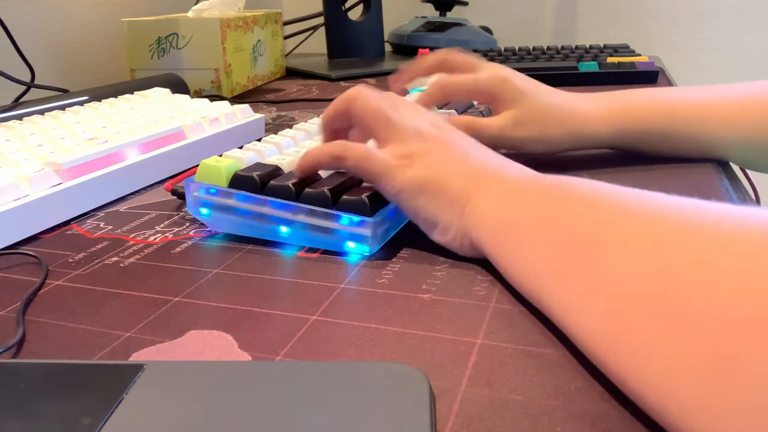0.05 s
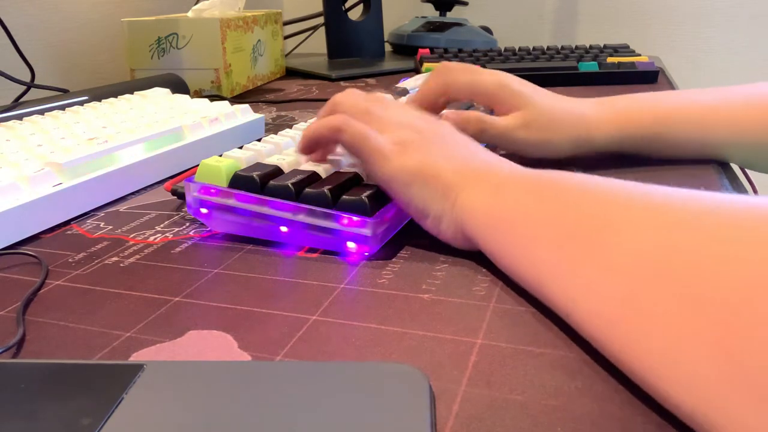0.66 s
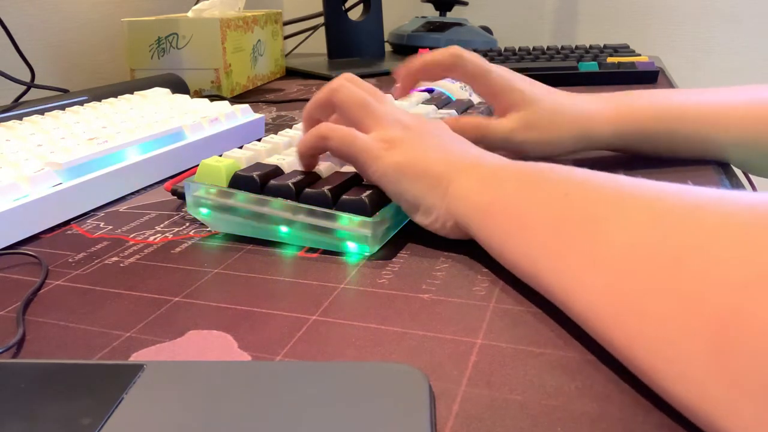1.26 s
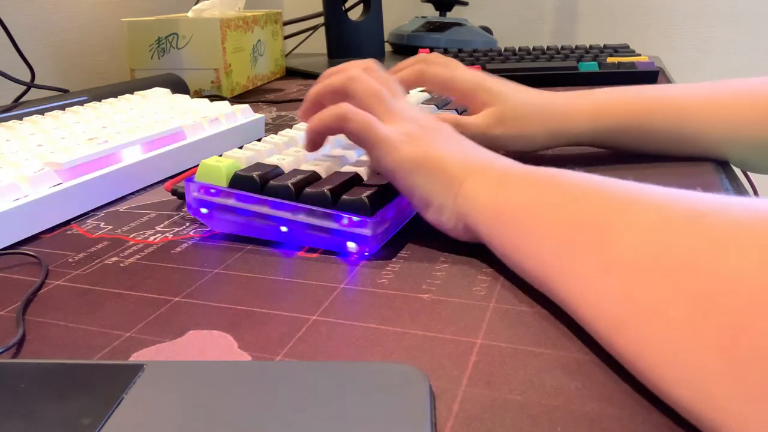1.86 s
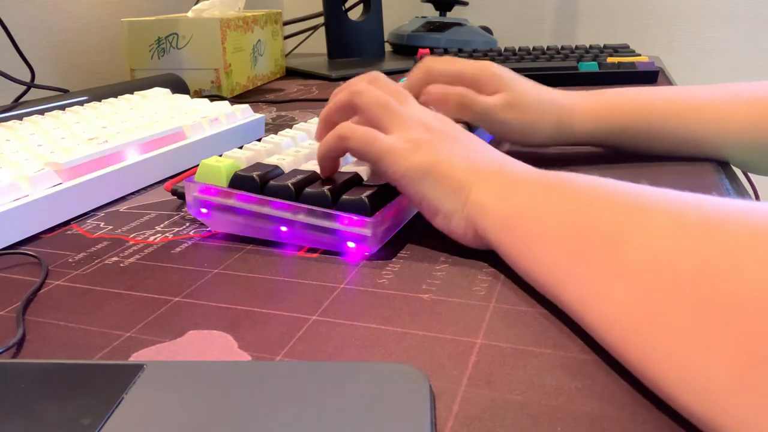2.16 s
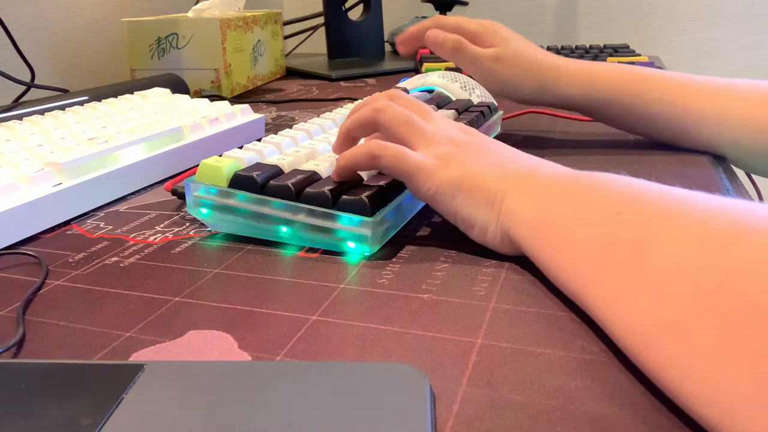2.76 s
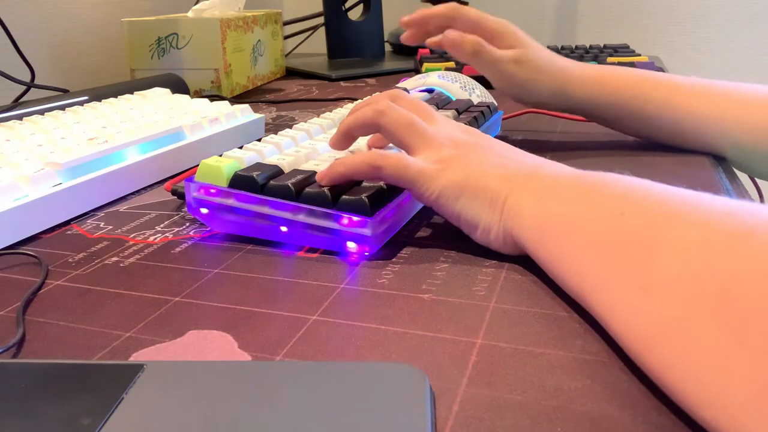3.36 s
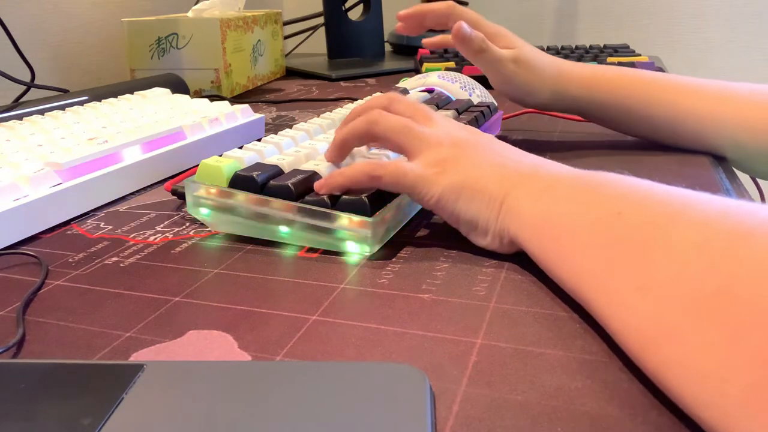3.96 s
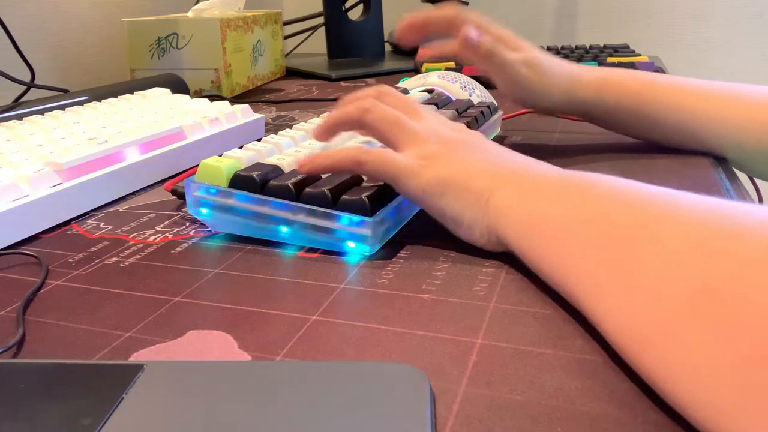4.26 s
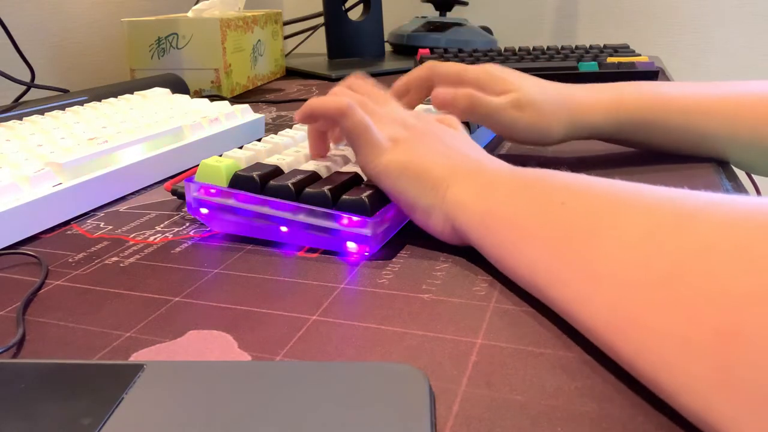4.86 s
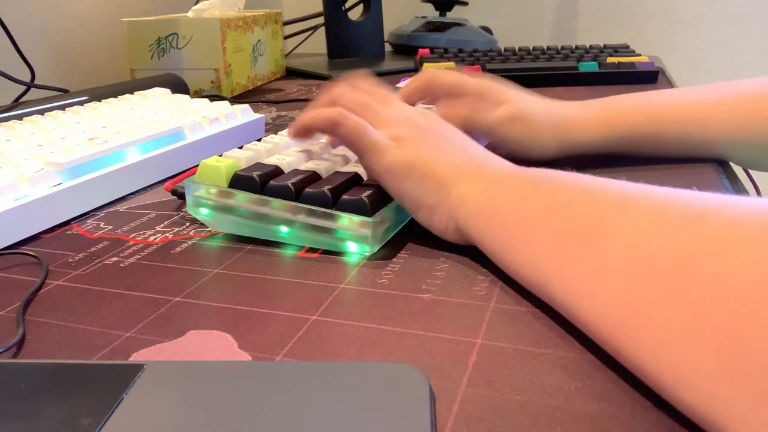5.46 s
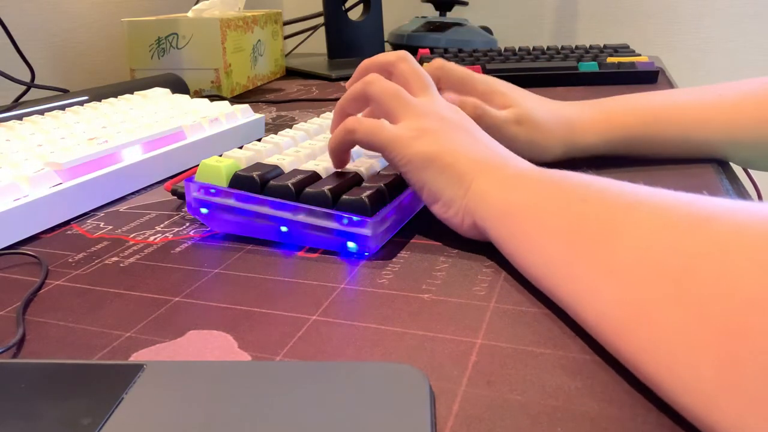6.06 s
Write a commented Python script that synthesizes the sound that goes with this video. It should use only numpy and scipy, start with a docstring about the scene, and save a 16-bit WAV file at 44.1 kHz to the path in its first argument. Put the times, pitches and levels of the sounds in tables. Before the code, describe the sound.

Fingers clack unevenly on a mechanical keyboard in a small room, pause for two loud key slaps, then resume typing.

```python
"""A small, hard-walled room, the microphone close to a mechanical keyboard on a padded desk.
Air and ventilation rumble and hum underneath. Each key ticks in its switch, clacks in cap and plate
and thuds into the desk. Letter keys clack lightly and their springs ping, the space bar snaps and
shakes the case, and twice a wide, hollow key is slapped hard. The loudest blows overload the microphone."""
import sys
import numpy as np
from scipy import signal
from scipy.fft import rfft, irfft, next_fast_len
from scipy.io import wavfile

SR = 44100
rng = np.random.default_rng(int(sys.argv[2]) if len(sys.argv) > 2 else 0)


def transcribe(signal):
    """Save signal, clipped to [-1, 1], as a 16-bit WAV file at the path in sys.argv[1]."""
    frames = np.atleast_2d(signal).T
    limited = np.clip(frames, -1, 1)
    pcm = np.round(limited * 32767).astype(np.int16)
    wavfile.write(sys.argv[1], SR, pcm)


N = 274302
T = np.arange(int(.6 * SR)) / SR  # seconds since a blow


def amp(db):
    """Decibels to gain."""
    return 10 ** (np.asarray(db) / 20)


def burst(x):
    """Scale to the energy of two milliseconds at rms 1."""
    return x * np.sqrt(.002 * SR / np.sum(x ** 2))


def along(points, hz):
    """(Hz, value) points read on a log axis."""
    freqs, values = np.transpose(points)
    return np.interp(np.log(hz + 1), np.log(freqs + 1), values)


def envelope(t60, rise):
    """A quick rise, then a decay of 60 dB in t60 seconds."""
    return (1 - np.exp(-T / rise)) * np.exp(-np.log(1000) * T / t60)


def filtered(x, response):
    """Filter x by a gain that depends on frequency."""
    size = next_fast_len(len(x) + SR // 2)
    return irfft(rfft(x, size) * response(np.fft.rfftfreq(size, 1 / SR)), size)[:len(x)]


def noise(length, response):
    """Filtered noise at rms 1."""
    x = filtered(rng.standard_normal(length), response)
    return x / np.sqrt(np.mean(x ** 2) + 1e-20)


def resonance(length, hz, width):
    """A narrow band of noise: a rough, wavering tone."""
    return noise(length, lambda f: 1 / (1 + (2 * (f - hz) / width) ** 2))


def coloured(x, spectrum, size=32768):
    """Minimum-phase colouring: nothing sounds before the blow."""
    cepstrum = irfft(np.log(amp(along(spectrum, np.fft.rfftfreq(size, 1 / SR)))))
    cepstrum[1:size // 2] *= 2
    cepstrum[size // 2 + 1:] = 0
    return irfft(rfft(x, size) * np.exp(rfft(cepstrum)))[:len(x)]


def add(track, s, sound):
    """Mix a sound into the track at s seconds."""
    start = max(round(s * SR), 0)
    track[start:start + len(sound)] += sound[:N - start]


# Air and rumble all around the microphone. Each row: frequency in Hz, relative level in dB.
AIR_SPECTRUM = [(20, -62.5), (32, -1.5), (45, 2), (60, 0), (85, -9.5), (125, -5.5), (160, -10),
                (210, -15.5), (260, -13), (400, -18.5), (1000, -26.5), (2500, -40), (5000, -46.5),
                (16000, -51.5)]
RUMBLE_SPECTRUM = [(2, -31), (6, -4.5), (11, 8.5), (16, 8), (24, -18), (40, -134), (100, -99)]
# The ventilation. Each row: pitch in Hz, width in Hz, level in dB.
VENT_TONES = [(32.14, 1, -36), (119.25, 4.6, -33), (204.1, 19, -30)]
def room_tone():
    """Steady air noise, a very deep rumble and the wavering drone of ventilation."""
    air = amp(-26) * noise(N, lambda f: amp(along(AIR_SPECTRUM, f)))
    rumble = amp(-14.5) * noise(N, lambda f: amp(along(RUMBLE_SPECTRUM, f)))
    drone = sum(amp(db) * resonance(N, hz, width) for hz, width, db in VENT_TONES)
    return air + rumble + drone


# How long the room rings. Each row: frequency in Hz, t60 in seconds.
ROOM_DECAY = [(100, 1.56), (500, 0.36), (1500, 0.3918), (5000, 0.3953), (9000, 0.4), (16000, 0.33)]
# The colour of its answer. Each row: frequency in Hz, relative level in dB.
ROOM_COLOUR = [(60, -7.5), (250, 4), (700, 1), (1500, 0), (5000, 0), (16000, 0)]
def room_tail(x, wet_db):
    """The diffuse sound coming back from the hard walls, new for every blow."""
    hz, t, bands = signal.stft(rng.standard_normal(len(T)), SR, nperseg=256)
    decay = np.exp(-np.log(1000) * t / along(ROOM_DECAY, hz)[:, None])
    tail = signal.istft(bands * decay, SR, nperseg=256)[1][:len(T)]
    tail *= 1 - np.exp(-T / .0038)
    tail = coloured(tail / np.linalg.norm(tail), ROOM_COLOUR)
    return amp(wet_db) * signal.fftconvolve(x, tail)[:len(x)]


# Surfaces near the microphone. Each row: delay in seconds, level in dB.
REFLECTIONS = [(.0025, -6.5), (.0092, -12.5), (0.0197, -19.5)]
def with_echoes(x):
    """The direct sound and its first echoes, whose paths vary a little from blow to blow."""
    heard = x.copy()
    for delay, db in REFLECTIONS:
        lag = int(delay * SR * rng.uniform(.9, 1.1))
        heard += amp(db) * np.pad(x, (lag, 0))[:len(x)]
    return heard


def click(spectrum):
    """A single clean impulse of the given colour."""
    return burst(coloured(1. * (T == 0), spectrum))


def crack(spectrum, t60, rise=.00033):
    """A short burst of contact noise."""
    return burst(coloured(rng.standard_normal(len(T)) * envelope(t60, rise), spectrum))


def ring(modes, scatter_db, detune, rise):
    """Damped modes; each blow scatters their strengths and pitches by the given amounts."""
    tones = np.zeros(len(T))
    for hz, db, t60 in modes:
        strength, tuning, polarity = rng.standard_normal(3)
        tone = np.sign(polarity) * np.sin(2 * np.pi * hz * (1 + detune * tuning) * T)
        tones += amp(db + scatter_db * strength) * envelope(t60, rise) * tone
    return tones


def keycap(hz, t60):
    """Bending waves in the keycap: the high ones arrive first, so the pitch falls."""
    pitch = hz * (1 + .59 * np.exp(-T / .0013))
    return burst(np.sin(2 * np.pi * np.cumsum(pitch) / SR) * envelope(t60, rise=.012))


# Plastic on plastic, and the desk's many weak modes. Each row: frequency in Hz, relative level in dB.
CLACK_SPECTRUM = [(120, -18.5), (400, -16.5), (700, -4.5), (1000, -0.5), (1500, -1), (2500, -5.5),
                  (3000, -11.5), (3700, -9.5), (4600, -15.5), (8000, -44.5)]
KNOCK_SPECTRUM = [(30, -15.5), (70, 8.5), (150, -8.5), (300, -5.5), (500, -12.5), (900, -24), (2000, -37)]
# Small parts of cap and switch. Each row: pitch in Hz, relative level in dB, t60 in seconds.
SHELL_MODES = [(3370, 1.5, 0.017), (4290, -5.5, 0.0063), (4860, 4, 0.0087), (5765, -1, 0.017),
               (6640, 3.5, 0.014), (7630, 3, 0.013), (9070, -6, 0.021), (10130, -6.5, 0.023)]
def strokes(contacts, plate, tick_colour, desk, *, clack_db, tick_db, thud_db, plate_db, grit_db,
            overtone_db, knock_db, wet_db, cap_t60, clack_t60, tick_t60, thud_rise, focus_db):
    """Each contact ticks in the switch, clacks in keycap and plate, and thuds into the desk."""
    track = np.zeros(N)
    for s, clack_level, tick_level, thud_level, cap_hz in contacts:
        cap = keycap(cap_hz, cap_t60) + amp(overtone_db) * keycap(1.8 * cap_hz, cap_t60 / 2)
        # the cap drives the plate modes near its own pitch best: focus_db less for each octave away
        driven = [(hz, db - focus_db * abs(np.log2(hz / cap_hz)), t60) for hz, db, t60 in plate]
        case = amp(plate_db) * burst(ring(driven, scatter_db=-1, detune=.027, rise=.001))
        shell = amp(-4) * burst(ring(SHELL_MODES, scatter_db=3, detune=.06, rise=.0005))
        clack_gain, tick_gain = amp(clack_level + clack_db), amp(tick_level + tick_db)
        # close to the microphone the struck cap stands out, with the grit of the contact
        direct = clack_gain * burst(cap + case + amp(grit_db) * crack(CLACK_SPECTRUM, clack_t60))
        direct += tick_gain * burst(shell + crack(tick_colour, tick_t60))
        # the room gathers sound from all directions, which evens out its spectrum
        radiated = clack_gain * burst(amp(-11) * cap + case + click(CLACK_SPECTRUM))
        radiated += tick_gain * burst(amp(-3) * shell + click(tick_colour))
        thud = ring(desk, scatter_db=0, detune=.0318, rise=thud_rise)
        thud += amp(knock_db) * crack(KNOCK_SPECTRUM, t60=.29, rise=.001)
        add(track, s, with_echoes(direct) + room_tail(radiated, wet_db) + amp(thud_level + thud_db) * thud)
    return track


CAP_HZ = 1416  # an ordinary keycap
def light_contact(s, db):
    """A cap moving without a finger's weight behind it: time, clack, tick and thud levels, pitch."""
    return s, db, db - 10, db - 13, CAP_HZ


# The fingers are busy. Each row: start and end in seconds.
TYPING_SPELLS = [(.1, 2.5), (4.401, 6.1)]
def grazes(per_second=3):
    """Fingers brush neighbouring caps, faintly and by chance."""
    return [light_contact(rng.uniform(start, end), db=rng.normal(-34, 5))
            for start, end in TYPING_SPELLS for _ in range(round(per_second * (end - start)))]


def return_db(blow_db):
    """A harder blow is followed by a livelier return."""
    return -9 + .97 * blow_db


# A long-held key let go: time in seconds, relative clack, tick and thud levels in dB, cap pitch in Hz.
MODIFIER_RELEASE = (4, -18, -23, -32, 1936)
# Letter keys, close up. Each row: start in seconds, relative strength and thud in dB, cap pitch in Hz,
# seconds held (0 when let up silently).
LETTER_PRESSES = [(.0142, -5.5, -18, 960, .0954), (.1748, -19.5, -36, 1470, 0),
                  (.2197, -18.5, -25, 1500, .117), (.2494, -5, -12, 935, .079), (.58, -14, -21, 1400, .129),
                  (.605, -12, -18, 1424, .14), (.7555, -8.5, -12, 1570, .1005),
                  (1.2463, -22.5, -24, 1910, 0), (1.2824, -11.5, -15, 1674, .124),
                  (1.8662, -18.5, -34, 970, .083), (2.0063, -24.5, -38, 1180, 0),
                  (2.0567, -11, -28, 1480, .084), (2.2917, -22, -19, 1215, 0),
                  (4.4313, -28, -31, 1270, .101), (4.6198, -19.5, -28, 1435, .034),
                  (4.73, -16.5, -17, 1620, .096), (4.7546, -14.5, -32, 1470, .096),
                  (4.896, -15.5, -33, 1420, 0), (4.94, -22, -27, 1220, .077), (5.0558, -10, -31, 1455, 0),
                  (5.3073, -14, -25, 1540, .077), (5.461, -15, -31, 1730, 0), (5.6965, -20, -39, 935, 0),
                  (5.825, -16.5, -33, 1336, .098), (5.9913, -19.5, -41, 950, 0)]
def letter_contacts():
    """The fingertip meets the cap, the key lands, and it springs back."""
    contacts = [MODIFIER_RELEASE]
    for s, db, thud_db, cap_hz, held in LETTER_PRESSES:
        contacts.append(light_contact(s - .006, db - 20))
        tick_db = -2 + 1.65 * db + 4.5 * np.log2(cap_hz / CAP_HZ)  # hard blows and small caps are brighter
        contacts.append((s, db, tick_db, thud_db, cap_hz))
        if held:
            contacts.append(light_contact(s + held, return_db(db)))
    return contacts


def springs(coil_hz=2546):
    """A thin, rough ping lingers as a letter key lands or returns: close modes of the coil beat."""
    pings = [(MODIFIER_RELEASE[0], -37, 3330)]  # the long-held key has a stiffer spring
    for s, db, _, cap_hz, held in LETTER_PRESSES:
        hz = coil_hz * (1 + .037 * rng.standard_normal())
        small_cap_db = 7 * np.log2(cap_hz / CAP_HZ)  # stronger under small, high caps
        pings.append((s, db - 19.5 + small_cap_db, hz))
        if held:  # the freed spring sings more readily
            pings.append((s + held, return_db(db) - 13.5 + small_cap_db, hz))
    track = np.zeros(N)
    for s, db, hz in pings:
        add(track, s, amp(db) * resonance(len(T), hz, width=160) * envelope(t60=.45, rise=.0013))
    return track


# Plate and desk under a light contact. Each row: pitch in Hz, relative level in dB, t60 in seconds.
LIGHT_PLATE_MODES = [(960, 3, 0.021), (1179, 2.5, 0.1), (1396, 14.5, 0.017), (1580, -29, 0.017),
                     (2020, -99, 0.01), (2350, -2, 0.17), (2630, 15, 0.018)]
LIGHT_DESK_MODES = [(60.8, 8, 0.16), (113.44, -3, 0.067), (238, -8.5, 0.071)]
# The switch's tick. Each row: frequency in Hz, relative level in dB.
LIGHT_TICK_SPECTRUM = [(1800, 4), (3300, 5), (5000, 4), (6200, -2.5), (7700, 1), (9000, -4), (10300, -2),
                       (11500, -7.5), (16000, -16.5)]
def light_clacks(contacts):
    """Short, rounded clacks of small keys and other light contacts."""
    return strokes(contacts, LIGHT_PLATE_MODES, LIGHT_TICK_SPECTRUM, LIGHT_DESK_MODES,
                   clack_db=1.5, tick_db=4, thud_db=-2.5, wet_db=-.5,
                   plate_db=-7, grit_db=-6, overtone_db=-14.5, knock_db=-9, focus_db=0,
                   cap_t60=.022, clack_t60=.011, tick_t60=.017, thud_rise=.0022)


# Plate and desk under the space bar. Each row: pitch in Hz, relative level in dB, t60 in seconds.
BAR_PLATE_MODES = [(676, 9, 0.067), (774, -36, 0.12), (1186, 5, 0.13), (1371, 3, 0.21),
                   (1600, -34.5, 0.051), (1860, 2, 0.17), (2172, 3.5, 0.14)]
BAR_DESK_MODES = [(65.6, 7, 0.29), (112.7, 2.5, 0.17), (215.9, 6.5, 0.22), (263, 2.5, 0.22),
                  (346, -17, 0.069)]
# The bar's tick. Each row: frequency in Hz, relative level in dB.
BAR_TICK_SPECTRUM = [(1800, -45), (3000, -8), (3800, -2), (4500, -3), (5300, 5), (6300, -7), (8000, -8.5),
                     (11000, -14.5), (16000, -18)]
# The space bar, close up. Each row: start in seconds, relative clack, tick and thud levels in dB,
# pitch in Hz, seconds held, relative return level in dB.
BAR_PRESSES = [(.3638, -3, -3, -7, 1792, .1365, -15), (1.0382, -4.5, -4.5, -12, 1260, .125, -25),
               (1.7074, -4, -3.5, -9, 1916, .1253, -19.5), (2.5117, -25, -22, -14.5, 1170, .09, -28),
               (5.088, -3, -5.5, -8, 1925, .13, -20), (5.4178, -6.5, -9, -11.5, 1390, .0944, -18.5),
               (6.1729, -7, -12, -13.5, 1410, .12, -20)]
def space_bar():
    """The long bar snaps brightly on its stabiliser and shakes the whole case."""
    landings = [press[:5] for press in BAR_PRESSES]
    return strokes(landings, BAR_PLATE_MODES, BAR_TICK_SPECTRUM, BAR_DESK_MODES,
                   clack_db=1.5, tick_db=1, thud_db=-1.5, wet_db=-2.5,
                   plate_db=-2, grit_db=1, overtone_db=-36, knock_db=9, focus_db=2,
                   cap_t60=.02, clack_t60=.0081, tick_t60=.007, thud_rise=.021)


def bar_contacts():
    """The thumb ticks on the space bar just before it lands; let go, the bar clicks back up."""
    contacts = []
    for s, _, tick_db, _, _, held, back_db in BAR_PRESSES:
        travel_s = min(.008 * 10 ** (-tick_db / 39.5), .0145)  # a softer stroke descends more slowly
        contacts.append((s - travel_s, tick_db - 21, tick_db - 13.5, tick_db - 33, CAP_HZ))
        contacts.append((s + held, back_db + 1, back_db - .5, back_db, CAP_HZ))
    return [contact for contact in contacts if contact[0] < N / SR]


# Plate and desk under the wide key. Each row: pitch in Hz, relative level in dB, t60 in seconds.
WIDE_PLATE_MODES = [(764, -7, 0.045), (825, -18, 0.055), (1054, -6.5, 0.034), (1170, 4, 0.024),
                    (1248, 2.5, 0.034), (1390, 10, 0.019), (1540, -7.5, 0.046), (1632, 3, 0.017),
                    (1810, -10, 0.048)]
WIDE_DESK_MODES = [(63.6, 1, 0.22), (123, -8, 0.513), (213.5, -11.5, 0.237), (344, -17, 0.025)]
# The wide key's tick. Each row: frequency in Hz, relative level in dB.
WIDE_TICK_SPECTRUM = [(1800, -13), (3200, -15), (4500, -2), (5300, 1.5), (7000, -1), (9000, -7.5),
                      (12000, -11.5), (16000, -22)]
# The hardest blows, close to the microphone.
# Each row: start in seconds, relative clack, tick and thud levels in dB, pitch in Hz.
WIDE_SLAPS = [(2.9508, 7, -10.5, -0.5, 1458), (3.511, 8, -6.5, 1.5, 1235)]
def slaps():
    """A wide key hit from high above rings hollow; the finger touches it just before it bottoms out."""
    touches = np.array(WIDE_SLAPS) + [-.004, -25, -25, -25, 0]
    return strokes(np.vstack([touches, WIDE_SLAPS]), WIDE_PLATE_MODES, WIDE_TICK_SPECTRUM, WIDE_DESK_MODES,
                   clack_db=-1, tick_db=1.5, thud_db=3, wet_db=2.5,
                   plate_db=1.5, grit_db=-2.5, overtone_db=-27, knock_db=-14.5, focus_db=4,
                   cap_t60=.024, clack_t60=.031, tick_t60=.0098, thud_rise=.015)


def scene():
    """Keyboard and room at one close microphone."""
    typing = light_clacks(letter_contacts() + bar_contacts() + grazes())
    return (typing + space_bar() + slaps() + springs() + room_tone())[None]


def record(dry):
    """The microphone's input clips at full scale, and nothing is kept above 16 kHz."""
    clipped = np.clip(dry[0], -1, 1)
    return filtered(clipped, lambda hz: hz < 16000)[None]


dry = scene()
out = record(dry)
transcribe(out)
```